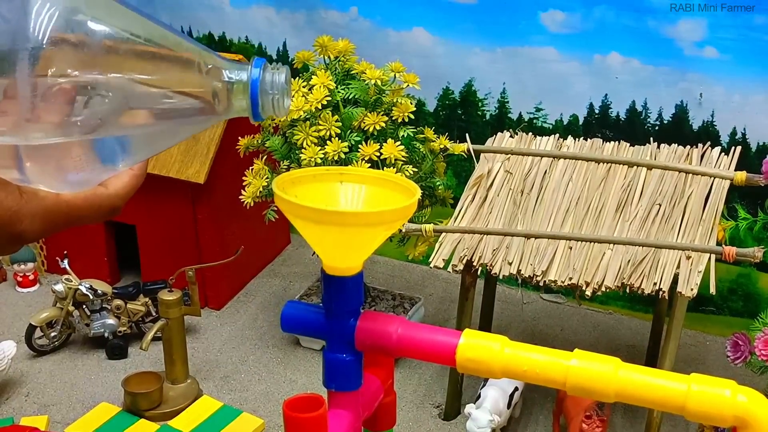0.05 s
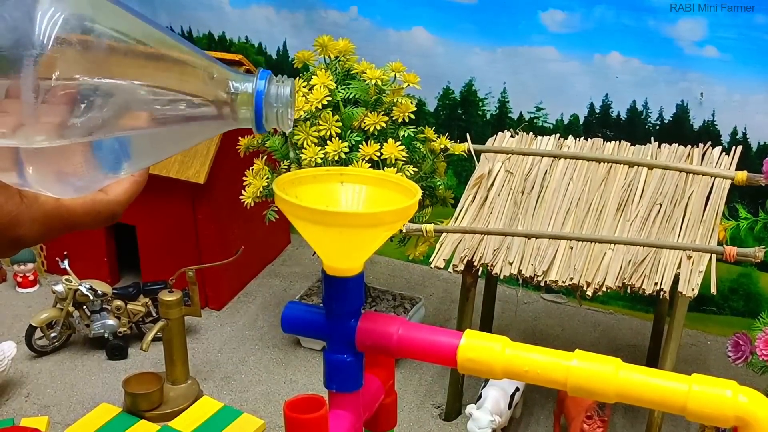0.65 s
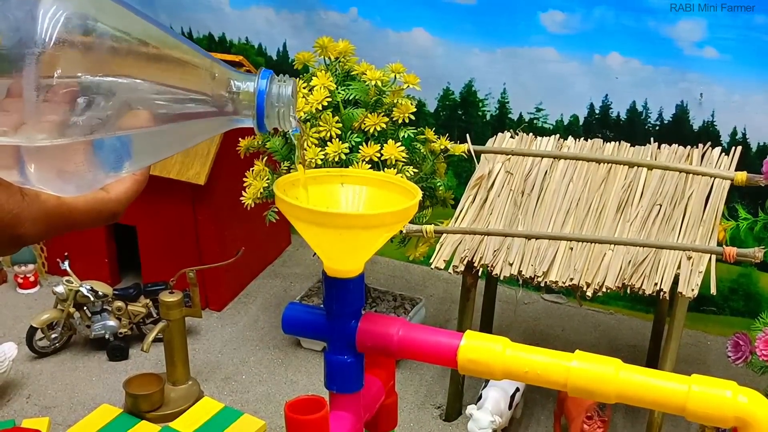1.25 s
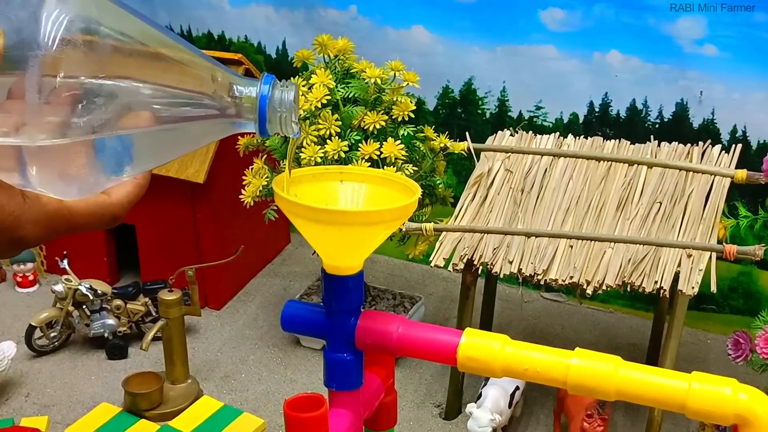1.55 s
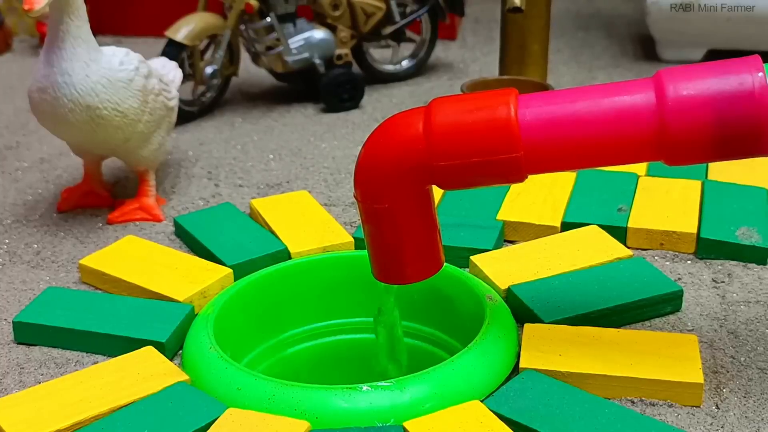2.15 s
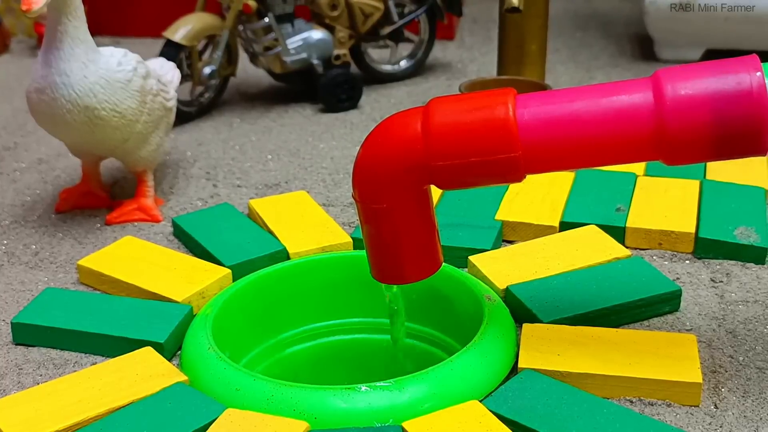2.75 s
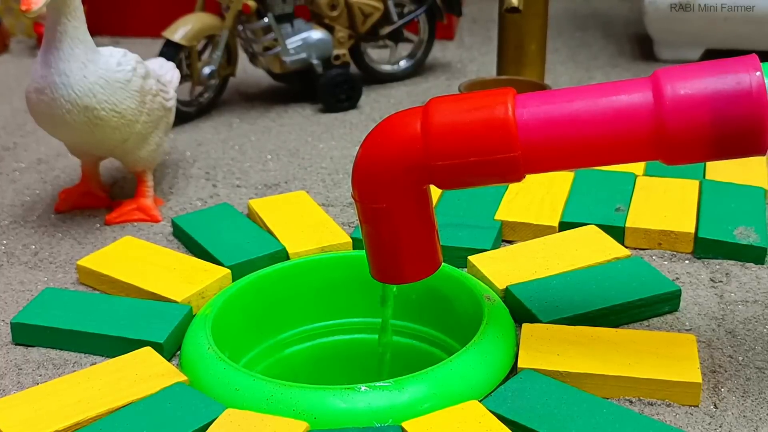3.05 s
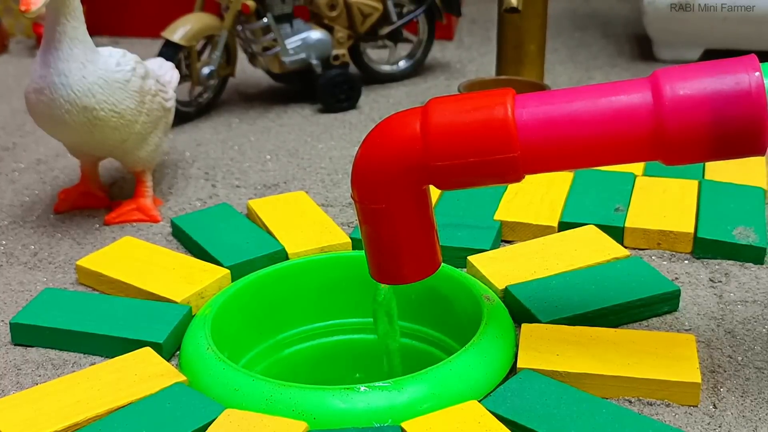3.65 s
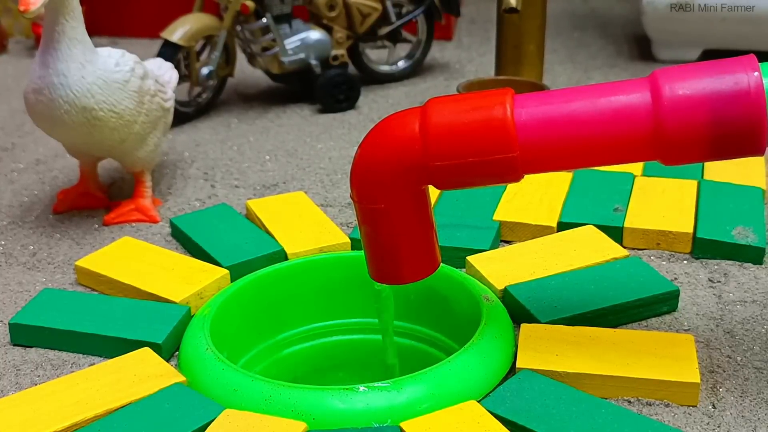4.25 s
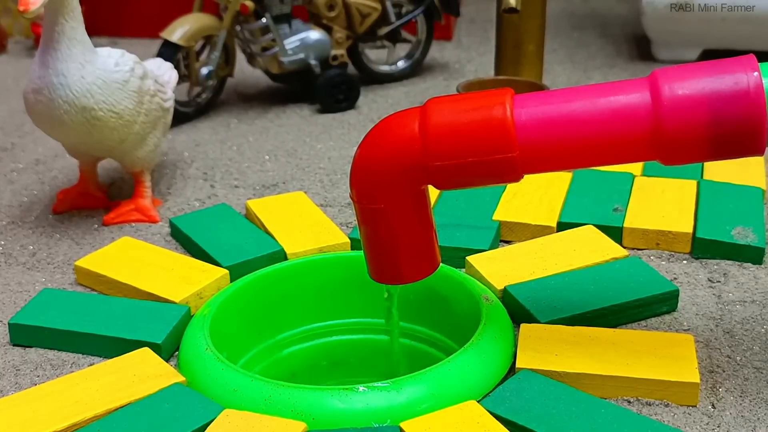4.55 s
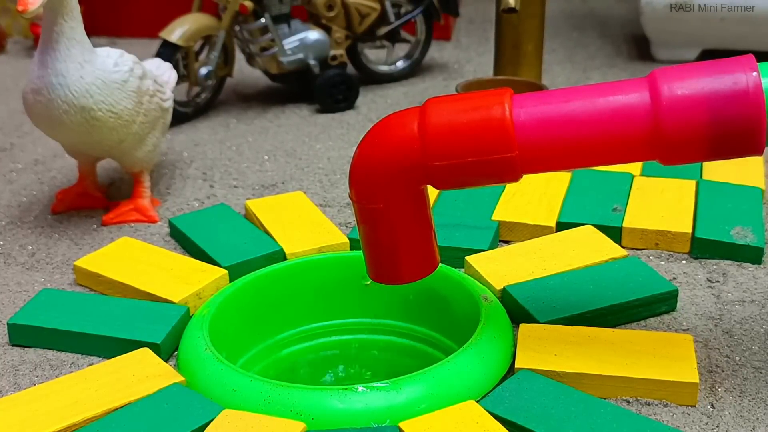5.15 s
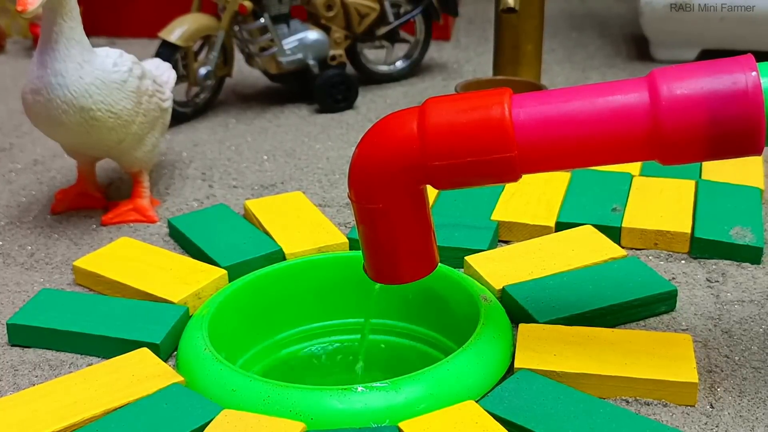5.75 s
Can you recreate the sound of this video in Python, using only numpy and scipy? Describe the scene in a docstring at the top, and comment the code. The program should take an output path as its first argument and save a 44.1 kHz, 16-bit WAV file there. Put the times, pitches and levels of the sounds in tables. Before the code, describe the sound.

Birds chirp faintly with a long echo, then water starts pouring from a bottle into a small funnel. It gurgles through plastic pipes with hollow plops, fine fizzing and crisp splashing drops. Later the stream drums softly into a plastic bowl, the birds return, and the gurgle dies away to a light trickle. The water is close to the microphone in a small room.

```python
"""Water through toy pipes

Water poured from a bottle into a small funnel gurgles through plastic pipes and falls into a plastic
bowl. Large bubbles plop and ring the air in the pipe, small ones fizz, drops splash; later the stream
drums on the bowl. Birds chirp faintly in the background, with a long echo."""
import sys
import numpy as np
from scipy import signal
from scipy.fft import rfft, irfft
from scipy.io import wavfile

SR = 44100
rng = np.random.default_rng(int(sys.argv[2]) if len(sys.argv) > 2 else 0)


def persist_wave(psi):
    """Save psi, clipped to +-1, as 16-bit WAV."""
    counts = np.round(np.clip(psi, -1, 1) * 32767).astype(np.int16)
    wavfile.write(sys.argv[1], SR, np.atleast_2d(counts).T)


N = 265041
TIME = np.arange(N) / SR
POUR_START_S, AIR_GONE_S = 0.776, 5.27  # first water in the funnel, last air out of the pipe


def gain_of(db):
    """Decibels to amplitude."""
    return 10 ** (np.asarray(db) / 20)


def unit_rms(x):
    """Scales to rms 1."""
    return x / np.sqrt(np.mean(x ** 2) + 1e-20)


def read(points, hz):
    """Reads a curve on a log-frequency axis."""
    f, value = np.transpose(points)
    return np.interp(np.log(hz + 1), np.log(f + 1), value)


def follow(rows):
    """One automation curve per column after the time, sample by sample."""
    s, *columns = np.transpose(rows)
    return [np.interp(TIME, s, c) for c in columns]


def swell(peak_s, spread_s):
    """A bell-shaped fade in and out."""
    return np.exp(-((TIME - peak_s) / spread_s) ** 2)


def add(mix, s, sound):
    """Mixes a sound in at time s."""
    part = mix[max(round(s * SR), 0):][:len(sound)]
    part += sound[:len(part)]


def colour(x, points, size=4096):
    """Minimum-phase EQ with the given curve."""
    log_gain = np.log(gain_of(read(points, abs(np.fft.fftfreq(size, 1 / SR)))))
    taps = np.fft.ifft(np.exp(np.conj(signal.hilbert(log_gain)))).real
    return signal.oaconvolve(x, taps[:size // 2])[:N]


def high_pass(x, hz):
    """Cuts the lows."""
    return signal.sosfilt(signal.butter(4, hz, "highpass", fs=SR, output="sos"), x)


def band_pass(x, low_hz, high_hz, order=2):
    """Keeps one band."""
    return signal.sosfilt(signal.butter(order, [low_hz, high_hz], "bandpass", fs=SR, output="sos"), x)


def resonate(x, hz, width_hz):
    """A resonance of gain 1 that follows the curve hz."""
    turn = np.exp(2j * np.pi * np.cumsum(hz) / SR)
    pole = np.exp(-np.pi * width_hz / SR)
    return 2 * (turn * signal.lfilter([1 - pole], [1, -pole], x / turn + 1e-18)).real


def wander(hz):
    """Smooth random modulation, mostly slower than hz; rms 1."""
    spectrum = rfft(rng.standard_normal(N))
    return unit_rms(irfft(spectrum / (1 + (np.fft.rfftfreq(N, 1 / SR) / hz) ** 4), N))


def reverberate(x, decays, delay_s):
    """A diffuse tail of energy 1, each band dying at its own speed."""
    hz, t, bands = signal.stft(rng.standard_normal(SR), SR, nperseg=256)
    decay = gain_of(-60 * t / read(decays, hz)[:, None])
    tail = signal.istft(bands * decay, SR, nperseg=256)[1]
    tail *= np.arange(len(tail)) > delay_s * SR
    return signal.oaconvolve(x, tail / np.linalg.norm(tail))[:N]


def bubble(t, hz, cycles, rise):
    """A sine that falls by 1/e in so many cycles and climbs in pitch as the bubble nears the surface."""
    age = np.maximum(t, 0) * hz / cycles
    return np.exp(-age) * np.sin(2 * np.pi * cycles * (age + rise * (age - 1 + np.exp(-age))))


def soft_bubble(t, hz, cycles, rise):
    """A bubble with its attack rounded over half a cycle."""
    return bubble(t, hz, cycles, rise) * (1 - np.exp(-2 * hz * t))


def swarm(per_s, pitch, octaves, cycles, rise, size_db, samples, count=1, straggle_s=0.003):
    """Clumps of count like-sized bubbles at random moments, scattered round a pitch curve; rms 1."""
    draws = rng.random((int(per_s * N / SR) + 1, 3 + 4 * count))
    when, size, tone = np.repeat(draws[:, :3], count, axis=0).T[:, :, None]
    late, ring, sign, detune = draws[:, 3:].reshape(-1, 4).T[:, :, None]
    onset = np.minimum(when * N - straggle_s * SR * np.log(late), N - 1).astype(int)
    transpose = octaves * (2 * tone - 1) + 0.23 * (2 * detune - 1) * (count > 1)
    hz = np.minimum((pitch * np.ones(N))[onset] * 2 ** transpose, SR / 2)
    height = gain_of(-size_db * np.log(np.maximum(size, 1 / 20))) * (2 * sign - 1)  # few are loud
    grains = height * np.sqrt(hz) * soft_bubble(TIME[:samples], hz, cycles * 2 ** (2 * ring - 1), rise)
    return unit_rms(np.bincount((onset + np.arange(samples)).ravel(), grains.ravel(), N)[:N])


def patter(bubbles, eq, lumps, mist_db, lump_db=2):
    """Separate bubbles over the hiss of countless finer ones, both coming in lumps; rms 1."""
    mist = gain_of(mist_db) * rng.standard_normal(N)
    return unit_rms(colour(bubbles + mist, eq) * gain_of(lump_db * lumps))


# EQ of the background bed: f/Hz, gain/dB
AMBIENCE_EQ = [(15, -50), (25, -3.5), (237, -8.5), (600, -14.5), (1420, -23), (1910, -16), (2180, -3),
               (2780, -2), (3180, -15), (4150, -15), (6540, -35.5), (15000, -44)]


def ambience(bed_db=-54, hum_db=-73, hum_hz=581.4):
    """A faint, steady noise bed with a slight hum."""
    bed = unit_rms(colour(rng.standard_normal(N), AMBIENCE_EQ))
    hum = np.sqrt(2) * np.sin(2 * np.pi * hum_hz * TIME)
    return gain_of(bed_db) * bed + gain_of(hum_db) * hum


# Bird whistles, one pitch arch each: t/s, length/s, start f/Hz, middle f/Hz, end f/Hz, level/dB
WHISTLES = [(0.0, 0.15, 3880, 4150, 3770, -60), (0.136, 0.053, 2050, 2893, 2060, -35),
            (0.201, 0.2, 3700, 6110, 3680, -51.5), (0.42, 0.21, 3410, 4210, 3620, -55.5),
            (0.531, 0.065, 2115, 3014, 2250, -39), (4.619, 0.074, 2600, 2210, 2500, -42.5),
            (4.781, 0.066, 2170, 2155, 2346, -41), (4.976, 0.076, 2570, 1900, 2350, -39.5),
            (5.406, 0.049, 2830, 2650, 2710, -40.5)]
# Bird trills: t/s, length/s, start f/Hz, middle f/Hz, end f/Hz, level/dB, depth/Hz, rate/Hz
TRILLS = [(0.076, 0.068, 2660, 2390, 2260, -44.5, 280, 133.5),
          (0.474, 0.066, 2660, 2453, 2328, -45, 300, 135.7),
          (4.672, 0.11, 2420, 2454, 2340, -42.5, 260, 47.8), (5.04, 0.18, 2270, 2153, 1930, -44, 187, 49.6),
          (5.32, 0.1, 3180, 3100, 3080, -38, 224, 159), (5.725, 0.11, 2960, 2620, 2210, -41, 166, 127),
          (5.8, 0.17, 2270, 2020, 1890, -46, 144, 117)]
# EQ that sets the birds back in the distance: f/Hz, gain/dB
BIRD_EQ = [(3000, 1.5), (4200, -6.5), (6000, -12)]
# Their long echo: f/Hz, t60/s
BIRD_DECAY = [(2000, 1), (6000, 1)]


def birds(reflections_db=-3, echo_db=-9, flutter_db=2):
    """Near-pure notes that arch in pitch, blurred by quick reflections and followed by a long echo."""
    song = np.zeros(N)
    unsteady = wander(hz=94)
    flutter = gain_of(flutter_db * wander(hz=35))
    for s, length, *arch_hz, db, depth_hz, rate_hz in TRILLS + [(*row, 0, 0) for row in WHISTLES]:
        t = np.arange(0, length, 1 / SR)
        waver = unsteady[int(s * SR):][:len(t)]
        arch = np.polyval(np.polyfit([0, .5, 1], arch_hz, 2), t / length)
        trill_phase = 2 * np.pi * np.cumsum(rate_hz * (1 + 0.15 * waver)) / SR
        hz = arch * (1 + 0.004 * waver) - depth_hz * np.cos(trill_phase)
        throb = gain_of(4 * np.sin(trill_phase) + 2 * waver)
        note = np.sin(2 * np.pi * np.cumsum(hz) / SR) * throb * signal.windows.tukey(len(t), 0.2)
        add(song, s, gain_of(db) * unit_rms(note))
    reflections = gain_of(reflections_db) * reverberate(song, [(1, 0.1)], delay_s=0)  # t60 of 0.1 s
    echo = gain_of(echo_db) * reverberate(song, BIRD_DECAY, delay_s=0.0037)
    return colour(flutter * song + reflections, BIRD_EQ) + echo


# Air resonances of the pipe; the upper dips, then rises as water fills in: t/s, upper f/Hz, lower f/Hz
PIPE_AIR = [(.85, 1870, 780), (1.0, 1098, 755), (1.33, 1148, 860), (1.47, 826, 715), (1.85, 777, 562),
            (2.2, 930, 522), (2.6, 1038, 380), (3.0, 1095, 324), (3.5, 1166, 255), (4.0, 1370, 224),
            (4.6, 1590, 211), (5.3, 1660, 216)]


def gurgle(lumps, resonance_db=6, hollow_db=-16, lump_db=3):
    """A steady run of mid-sized bubbles rings the two air resonances of the pipe; rms 1."""
    upper_hz, lower_hz = follow(PIPE_AIR)
    bubbles = swarm(per_s=800, pitch=upper_hz * .92, octaves=.48, cycles=3.5, rise=.046, size_db=2.5,
                    samples=1500)
    bubbles += gain_of(resonance_db) * resonate(bubbles, upper_hz, width_hz=125)
    hollow = swarm(per_s=130, pitch=lower_hz, octaves=.16, cycles=2.3, rise=.007, size_db=1,
                   samples=3000)
    return unit_rms(unit_rms(bubbles * gain_of(lump_db * lumps)) + gain_of(hollow_db) * hollow)


def trapped_air_db(full_db=3, gone_db=-18.5, choke_db_per_s=8):
    """Fader ride for the gurgle: it swells as the funnel fills and dies away once the air is gone."""
    funnel_full = full_db * swell(peak_s=1.76, spread_s=0.17)
    air_gone = gone_db * np.clip((TIME - AIR_GONE_S) / 0.059, 0, 1)
    choke = choke_db_per_s * np.maximum(TIME - 5.6, 0)
    return -1 + funnel_full + air_gone - choke


# Wet tone of the fizz, also used for the slap of the plops: f/Hz, gain/dB
FIZZ_EQ = [(250, -17.5), (500, 11), (1000, 18.5), (1600, -3), (2200, -0.5), (3300, 2.5), (4300, 0),
           (5200, -2.5), (6500, -3.5), (9000, -9)]


def fizz(lumps):
    """Small bubbles fizz, losing their body as the last air leaves the pipe."""
    bubbles = swarm(per_s=900, pitch=3000, octaves=1, cycles=5.5, rise=.035, size_db=3,
                    samples=600, count=3)
    full = patter(bubbles, FIZZ_EQ, lumps, mist_db=-10)
    drowned = np.clip(1 + TIME - AIR_GONE_S, 0, 1)
    return np.sqrt(1 - drowned) * full + np.sqrt(drowned) * high_pass(full, hz=1540)


# Bright tone of the spray: f/Hz, gain/dB
SPRAY_EQ = [(3500, -53), (5500, -1.5), (7000, 3.5), (9000, 2), (11700, 5), (12700, 3), (14000, -9),
            (15500, -39)]


def spray(lumps):
    """The tiniest bubbles put a sparkle on top of the stream; rms 1."""
    bubbles = swarm(per_s=300, pitch=8500, octaves=.65, cycles=6, rise=.015, size_db=4.6,
                    samples=260, count=5)
    return patter(bubbles, SPRAY_EQ, lumps, mist_db=-6)


def droplets(trim_db=-4, wet_s=2.4, wet_db_per_s=7, wet_floor_db=-10):
    """Lesser drops tick crisply on the plastic, more softly once water covers it."""
    ticks = swarm(per_s=60, pitch=4300, octaves=1, cycles=4.7, rise=.035, size_db=3,
                  samples=600, count=3, straggle_s=.0015)
    covered_db = np.clip(wet_db_per_s * (wet_s - TIME), wet_floor_db, 0)
    return gain_of(trim_db + covered_db) * unit_rms(band_pass(ticks, 1500, 12000, order=4))


# Large bubbles closing: t/s, relative level/dB, f/Hz
LARGE_BUBBLES = [(0.824, -33.5, 1850), (0.89, -26.5, 1665), (0.929, -26, 1930), (0.981, -24.5, 1118),
                 (1.016, -26, 890), (1.058, -22.5, 1826), (1.071, -22.5, 1033), (1.088, -21, 1045),
                 (1.096, -22, 1920), (1.11, -27, 1116), (1.13, -22, 1000), (1.169, -18.5, 2030),
                 (1.211, -20.5, 1670), (1.257, -13.5, 1750), (1.259, -16, 1113), (1.294, -14.5, 1017),
                 (1.315, -18, 1060), (1.331, -9.5, 2010), (1.368, -18, 1310), (1.392, -15.5, 809),
                 (1.434, -17, 810), (1.466, -18, 780), (1.484, -12, 818), (1.513, -19, 613),
                 (1.552, -19.5, 774), (1.582, -18, 777), (1.59, -22.5, 605), (1.629, -13.5, 830),
                 (1.638, -18.5, 810), (1.669, -15, 840), (1.705, -16.5, 765), (1.722, -13.5, 880),
                 (1.741, -10.5, 842), (1.764, -10.5, 837), (1.842, -25, 522), (1.862, -21, 820),
                 (1.892, -18.5, 846), (2.032, -14.5, 852), (2.07, -17.5, 874), (2.094, -15, 940),
                 (2.103, -18.5, 880), (2.128, -17, 867), (2.188, -18, 906), (2.224, -14.5, 920),
                 (2.251, -20, 960), (2.286, -20, 894), (2.394, -17, 956), (2.429, -15, 896),
                 (2.503, -16, 910), (2.655, -19, 865), (2.713, -20.5, 830), (2.734, -17, 957),
                 (2.75, -16.5, 1070), (2.829, -21.5, 1024), (2.854, -17, 1014), (2.868, -16, 1020),
                 (2.901, -11, 1000), (2.951, -12, 1000), (2.989, -14, 1137), (3.064, -10, 1016),
                 (3.088, -14.5, 967), (3.122, -14, 1160), (3.165, -11.5, 1054), (3.288, -18, 1166),
                 (3.446, -16, 1083), (3.494, -19, 1170), (3.518, -21.5, 1120), (3.542, -10.5, 1190),
                 (3.598, -18.5, 1135), (3.627, -19, 1166), (3.655, -20, 980), (3.732, -15, 1300),
                 (3.885, -14, 1620), (4.032, -10.5, 1510), (4.062, -15, 1330), (4.079, -16, 1450),
                 (4.123, -15.5, 1680), (4.146, -13.5, 1195), (4.356, -21.5, 1460), (4.437, -17.5, 1710),
                 (4.542, -15.5, 1478), (5.009, -18.5, 1490), (5.119, -19, 1660), (5.146, -17.5, 1760)]


def plops(trim_db=4, rise=0.018, slap_db=-16, slap_s=0.0031, clear_cycles=8.7, dull_cycles=2.64):
    """Large bubbles slap shut and ring, duller as the pipe fills, and set its air ringing below them."""
    out, t = np.zeros(N), TIME[:SR // 14]
    lower_hz = follow(PIPE_AIR)[1]
    wet = unit_rms(colour(rng.standard_normal(N), FIZZ_EQ))
    for s, db, hz in LARGE_BUBBLES:
        onset = round(s * SR)
        empty = np.exp((POUR_START_S - s) / 0.64)
        cycles = (dull_cycles + (clear_cycles - dull_cycles) * empty) * 2 ** rng.uniform(-0.58, 0.62)
        slap = gain_of(slap_db) * (1 - empty) * wet[onset:][:len(t)] * np.exp(-t / slap_s)
        ring = bubble(t, hz * (1 - rise / 2), cycles, rise) * (1 - np.exp(-2 * hz * t))
        # a faint tail chirps upward, ringing for about 12 ms; it grows fainter as the pipe fills
        tail = gain_of(-4 - 4 * s) * bubble(t, hz, hz * .012, rise=.09) * (1 - np.exp(-t / .004))
        pocket_hz = lower_hz[onset]
        pocket = bubble(t, pocket_hz, 2.53 * pocket_hz / 500, rise) * (1 - np.exp(-t * pocket_hz))
        coupling = gain_of(-10) * (2 * pocket_hz / hz) ** 2.1  # stronger when the pitches lie close
        plop = high_pass(slap + ring + tail + coupling * pocket, 0.76 * pocket_hz)
        add(out, s, gain_of(db + trim_db) * plop)
    return out


# Loud drops bursting into tiny bubbles: t/s, level/dB, centre f/Hz, scatter/octaves
LOUD_DROPS = [(0.8815, -27, 3550, 0.2), (1.176, -31.5, 4900, 0.092), (1.1996, -25.5, 5170, 0.065),
              (1.2107, -24, 7100, 0.24), (1.2394, -28, 6160, 0.05), (1.252, -22.5, 5200, 0.23),
              (1.3283, -16, 5100, 0.24), (1.3326, -20.5, 3980, 0.13), (1.3483, -25, 3800, 0.13),
              (1.3653, -16, 4900, 0.088), (1.4, -21, 2800, 0.091), (1.4199, -20, 4100, 0.17),
              (1.4327, -23, 11500, 0.3), (1.469, -20.5, 3520, 0.27), (1.5483, -20.5, 4340, 0.33),
              (1.5809, -14.5, 3820, 0.11), (1.625, -17, 4330, 0.075), (1.706, -21.5, 11900, 0.091),
              (1.7206, -16.5, 3300, 0.25), (1.83, -25, 3880, 0.09), (1.8617, -24, 3030, 0.67),
              (1.947, -23.5, 3580, 0.44), (1.915, -27.5, 4700, 0.091), (1.929, -30, 5500, 0.75),
              (2.001, -20, 4300, 0.052), (2.1256, -20, 4800, 0.81), (2.175, -19.5, 2650, 0.78),
              (2.2237, -29, 7660, 0.19), (2.3306, -25.5, 4340, 0.067), (2.365, -28, 2910, 0.15),
              (2.565, -18, 3180, 0.41), (2.713, -24.5, 3260, 0.69), (2.7499, -25.5, 3550, 0.36),
              (2.765, -21.5, 2730, 0.048), (2.855, -24, 10500, 0.27), (2.925, -25, 6960, 0.92),
              (2.951, -23, 6550, 0.66), (3.088, -24, 6500, 0.6), (3.0961, -22, 3360, 0.19),
              (3.116, -23, 3120, 0.5), (3.138, -22.5, 3400, 0.093), (3.222, -32, 2850, 0.088),
              (3.4469, -26.5, 3100, 0.12), (3.5, -28, 2715, 0.08), (3.534, -25.5, 3300, 0.35),
              (3.67, -31, 12400, 0.025), (4.2898, -26, 3640, 0.13), (4.55, -22, 5000, 0.38),
              (4.598, -27, 3400, 0.057), (4.821, -24, 4540, 0.56), (4.9441, -22.5, 4640, 0.61),
              (5.2716, -25.5, 3440, 0.12), (5.2814, -28.5, 5030, 0.74), (5.354, -28, 8400, 0.051),
              (5.536, -22.5, 4150, 0.15), (5.712, -26, 3800, 0.14), (5.7756, -24, 4870, 0.41),
              (5.967, -25, 3500, 0.19)]


def splashes(cycles=3.6, rise=0.024, straggle_s=0.0022, count=14):
    """A drop cracks on impact and makes one main bubble, then lesser ones within milliseconds."""
    out, t = np.zeros(N), TIME[:SR // 40]
    for s, db, hz, scatter in LOUD_DROPS:
        late = rng.exponential(straggle_s, (count, 1))
        satellite_hz = np.minimum(hz * 2 ** (1.234 * scatter * rng.standard_normal((count, 1))), 12000)
        satellites = gain_of(-8) * bubble(t - late, satellite_hz, cycles * 0.79, rise).sum(0)
        crack = gain_of(-4) * 2 * scatter ** 2 * rng.standard_normal(len(t)) * np.exp(-t / 0.0037)
        tick = gain_of(-2) * bubble(t, hz, cycles=0.27, rise=0)
        drop = tick + crack + bubble(t, hz, cycles, rise) + satellites
        drop = band_pass(drop, .4 * hz, min(hz * 2 ** (.5 + 2 * scatter), 13000))
        add(out, s + .0003, gain_of(db) * unit_rms(drop) / np.sqrt(6))  # energy is in the first sixth
    return out


def gushes_db(peak_db=14, spread_s=0.0041):
    """A quick swell of the stream round each loud drop."""
    nearest_s = np.min([abs(TIME - s) for s, *_ in LOUD_DROPS], axis=0)
    return peak_db * np.exp(-nearest_s / spread_s)


def plips(trim_db=-2):
    """Small, clear bubbles chirp upward in the shallow water at the bottom of the funnel."""
    bubbles = swarm(per_s=130, pitch=2150, octaves=.3, cycles=10, rise=.04, size_db=2, samples=1500)
    return gain_of(trim_db) * swell(peak_s=1.49, spread_s=0.5) * bubbles


def plinks(trim_db=-3, overtone_ratio=2.5, width_hz=450, mouth_db=-2):
    """A dense run of small bubbles bursts inside the pipe and rings its overtone and its mouth."""
    overtone_hz = overtone_ratio * follow(PIPE_AIR)[0]
    bursts = swarm(per_s=700, pitch=2900, octaves=.6, cycles=1.2, rise=.03, size_db=2.6,
                   samples=300, count=2)
    overtone = unit_rms(resonate(resonate(bursts, overtone_hz, 2 * width_hz), overtone_hz, width_hz))
    mouth = gain_of(mouth_db) * unit_rms(band_pass(bursts, 3210, 3590))
    return gain_of(trim_db) * swell(peak_s=2.84, spread_s=1.17) * unit_rms(overtone + mouth)


def slosh(trim_db=-16, fall_s=0.0087, width_hz=90, octave_db=-3):
    """Large bubbles shove water in the half-full pipe: a glug at the lower resonance and its octave."""
    lower_hz = follow(PIPE_AIR)[1]
    shoves, t = np.zeros(N), TIME[:SR // 10]
    for s, db, _ in LARGE_BUBBLES:
        add(shoves, s, gain_of(db) * np.exp(-t / fall_s) * rng.standard_normal(len(t)))
    low, octave = (resonate(resonate(shoves, hz, 2 * width_hz), hz, width_hz=2 * width_hz)
                   for hz in (lower_hz, 2 * lower_hz))
    half_full = swell(peak_s=3.12, spread_s=0.79)
    makeup = np.sqrt(SR / (2 * np.pi * width_hz)) / 2
    return gain_of(trim_db) * half_full * makeup * (low + gain_of(octave_db) * octave)


# Strength of the stream, riding gurgle, fizz, spray, droplets and plinks: t/s, level/dB
STREAM_FLOW = [(0.8, -43), (0.9, -39.5), (1.0, -50.5), (1.1, -43.5), (1.33, -35.5), (1.45, -42.5),
               (1.6, -37.5), (1.95, -35.5), (1.985, -47.5), (2.005, -35.5), (2.3, -40), (2.54, -29.5),
               (2.61, -42), (2.66, -35.5), (2.79, -43), (2.87, -34), (3.1, -38), (3.32, -43.5), (3.55, -40),
               (3.8, -40.5), (4.6, -35), (5.25, -39.5), (5.4, -43.5), (5.8, -39), (6.0, -43)]


def pour(usual_db=-35.5, plop_db=-3, ringing_db=-13):
    """The stream breaks into bubbles, louder the stronger it flows; large ones ring the pipe's air."""
    flow_db = follow(STREAM_FLOW)[0] - usual_db
    upper_hz = follow(PIPE_AIR)[0]
    fade_in = np.clip((TIME - POUR_START_S) / 0.015, 0, 1)
    trickle_db = -19 * np.clip(1 - (TIME - POUR_START_S) / 0.26, 0, 1)  # the first trickle is quiet
    gush_db = gushes_db()
    lumps = wander(hz=30)  # the stream arrives in lumps
    stream = (gain_of(-2 + 0.56 * flow_db + 0.94 * trickle_db + 0.17 * gush_db) * fizz(lumps)
              + gain_of(-6.5 + flow_db + gush_db) * spray(lumps)
              + gain_of(trapped_air_db() + 0.36 * flow_db + 4.3 * trickle_db) * gurgle(lumps)
              + plips()
              + gain_of(0.56 * flow_db + trickle_db) * (droplets() + plinks()))
    large = plops()
    ringing = resonate(resonate(large, upper_hz, width_hz=58), upper_hz, width_hz=110)
    water = gain_of(usual_db) * stream + gain_of(plop_db) * large + gain_of(ringing_db) * ringing
    water += slosh() + splashes()
    return high_pass(fade_in * water, hz=177)  # nothing of the water sounds below about 177 Hz


# Fader ride of the stream drumming on the thin bowl: t/s, relative level/dB
DRUM_RIDE = [(3.6, -43.5), (4.28, -37), (4.85, -39), (5.6, -37.5), (5.65, -36), (6.01, -53)]
# Body of the plastic bowl: f/Hz, gain/dB
BOWL_EQ = [(20, -16), (40, -2), (62, -5.5), (105, -1), (160, -8), (230, -3.5), (330, -10), (500, -5),
           (900, -14.5), (2000, -101)]
# Slugs of water plopping into the bowl: t/s, level/dB, f/Hz
WATER_SLUGS = [(4.2, -24, 170), (4.249, -19, 135), (4.422, -22, 210), (5.191, -31, 420), (5.227, -26, 240),
               (5.337, -24.5, 221), (5.695, -27, 233)]


def drumming(trim_db=-5, start_s=3.65, ring_s=0.0059):
    """Round, dull plops of the stream in the bowl, and a few heavier slugs of water."""
    knocks = swarm(per_s=300, pitch=190, octaves=1.9, cycles=1.25, rise=.03, size_db=2.8, samples=2400)
    fade_in = np.clip((TIME - start_s) / 0.17, 0, 1)
    out = gain_of(follow(DRUM_RIDE)[0] + trim_db) * fade_in * unit_rms(colour(knocks, BOWL_EQ))
    for s, db, hz in WATER_SLUGS:
        add(out, s, gain_of(db) * soft_bubble(TIME[:SR // 10], hz, ring_s * hz, rise=0.018))
    return out


# Tight reverb of the small room: f/Hz, t60/s
ROOM_DECAY = [(200, 0.18), (1000, 0.049), (4000, 0.055), (12000, 0.12)]


def scene(room_db=-10.5):
    """Close water in a small room, birds behind; mono."""
    water = pour() + drumming()
    room = gain_of(room_db) * reverberate(water, ROOM_DECAY, delay_s=0.0056)
    return (water + room + birds() + ambience())[None]


def record(dry, cutoff_hz=15400):
    """A steep high cut on the whole mix."""
    taps = signal.firwin(401, cutoff_hz, window=("kaiser", 9), fs=SR)
    return signal.oaconvolve(dry, taps[None], "same")


dry = scene()
out = record(dry)
persist_wave(out)
```